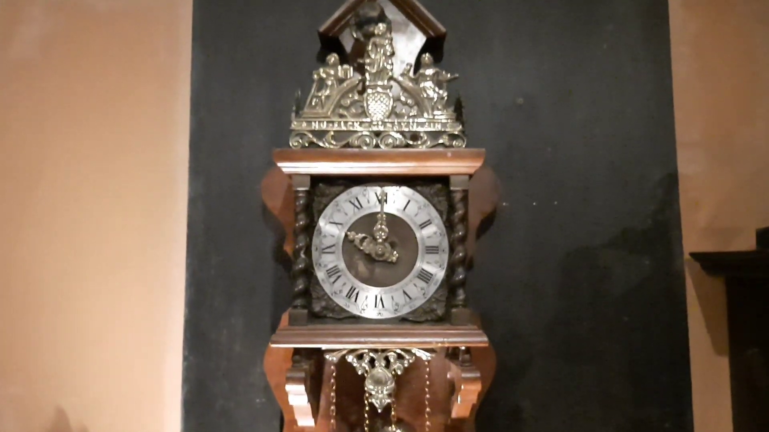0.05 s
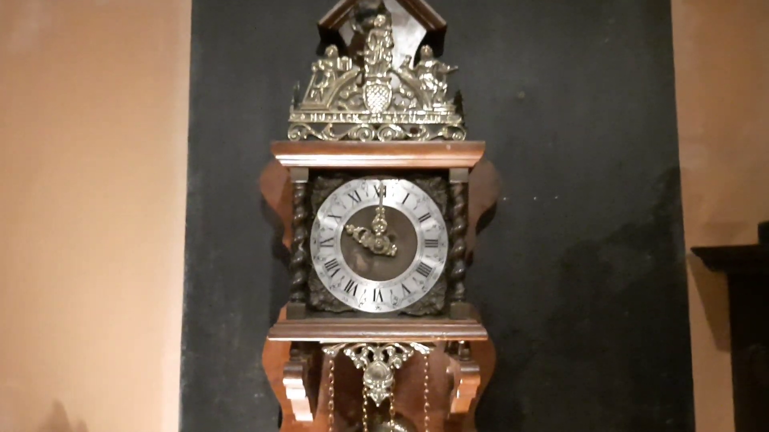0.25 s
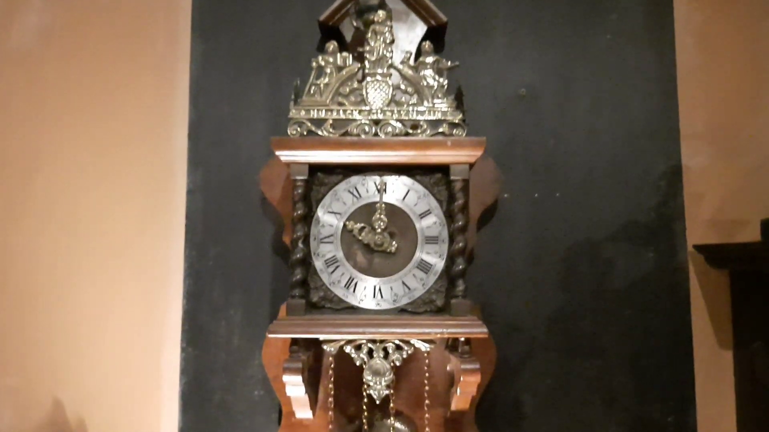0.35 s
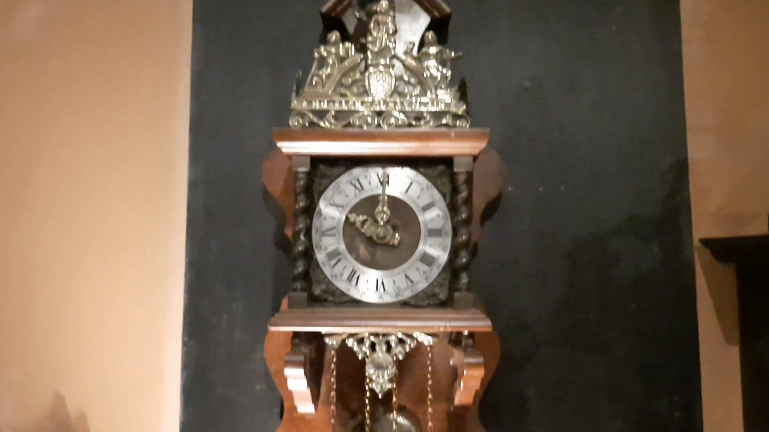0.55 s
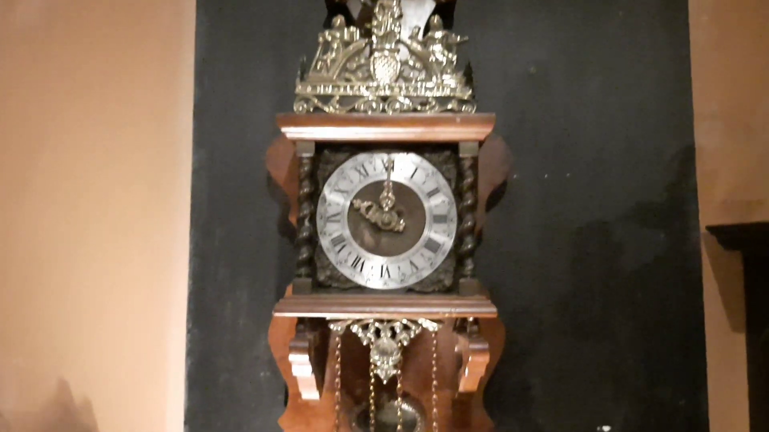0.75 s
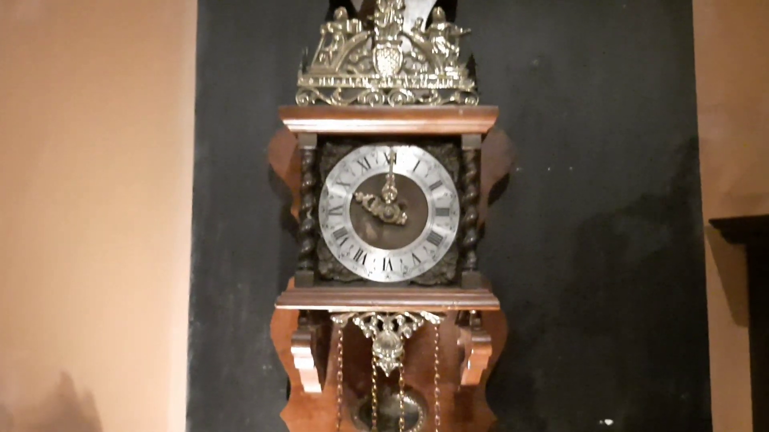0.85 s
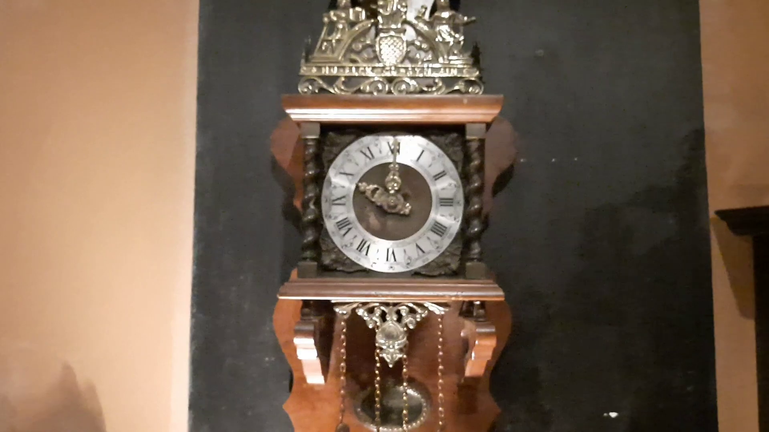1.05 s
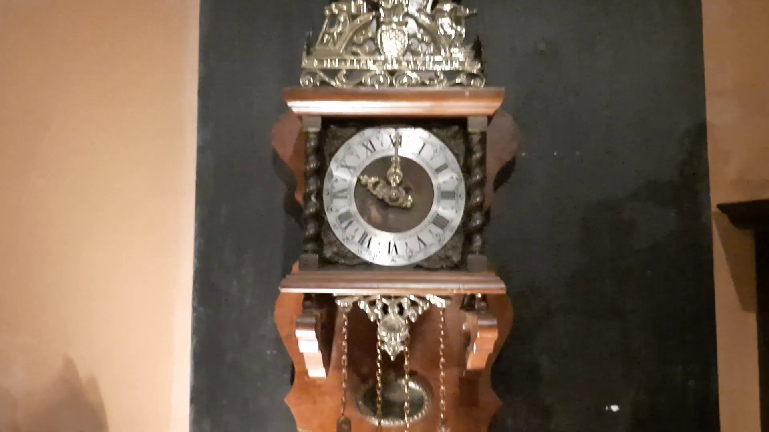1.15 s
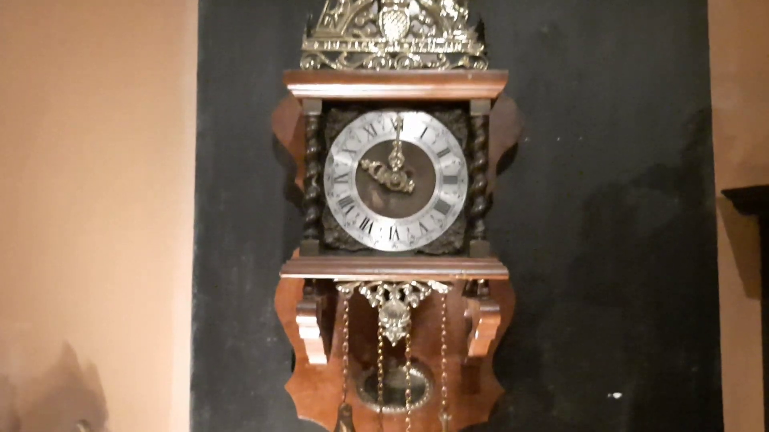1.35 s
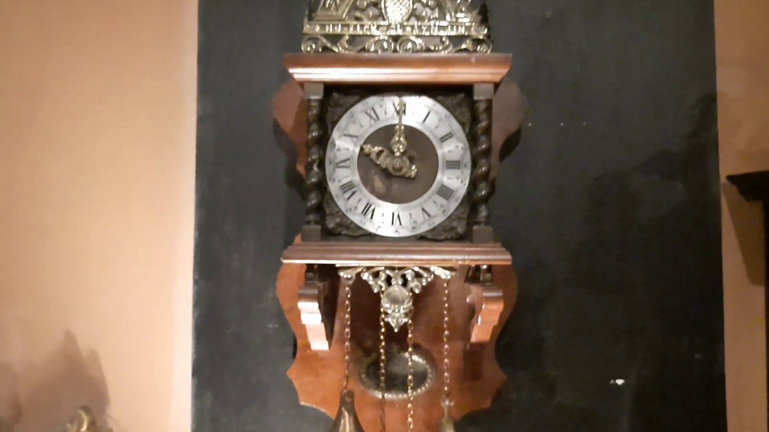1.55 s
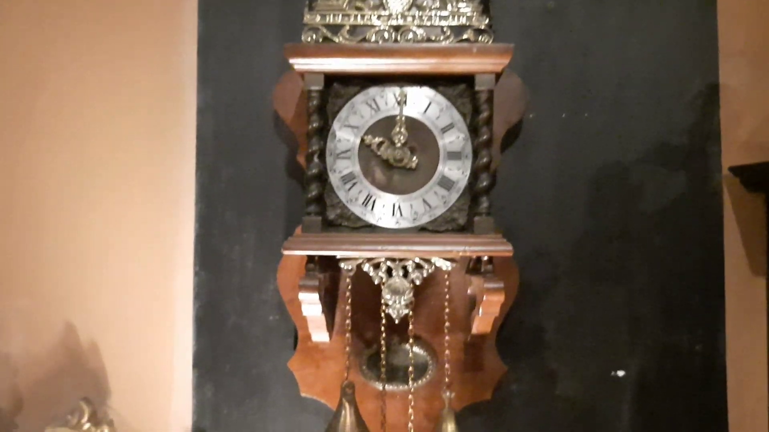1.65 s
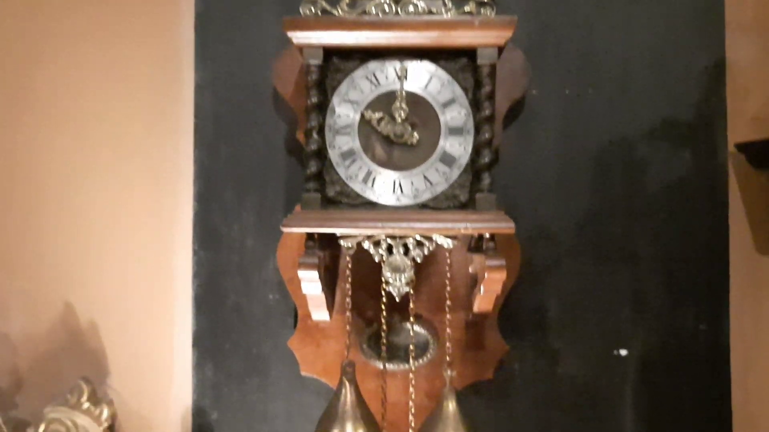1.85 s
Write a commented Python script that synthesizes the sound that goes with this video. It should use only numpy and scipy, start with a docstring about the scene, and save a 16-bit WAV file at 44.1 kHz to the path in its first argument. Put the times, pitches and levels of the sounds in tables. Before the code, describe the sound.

A wall clock bell strikes once and rings on over faint ticking.

```python
"""A quiet room drones and hums with the mains while a wall clock's bell still rings from its last stroke.
The striking wheels rustle and the hammer lifts with two dull knocks. At 0.22 s it hits the small bell
once: a crack, a short ring of the case and a shimmer in the room. The bell's high tones die fast;
the low ones ring on and beat differently at each ear, while the clock ticks softly."""
import sys
import numpy as np
from scipy import signal
from scipy.fft import rfft, irfft
from scipy.io import wavfile

SR = 44100
rng = np.random.default_rng(int(sys.argv[2]) if len(sys.argv) > 2 else 0)


def transcribe(signal):
    """Save signal, clipped to [-1, 1], as a 16-bit WAV file at the path in sys.argv[1]."""
    frames = np.atleast_2d(signal).T
    limited = np.clip(frames, -1, 1)
    pcm = np.round(limited * 32767).astype(np.int16)
    wavfile.write(sys.argv[1], SR, pcm)


N = 83790
STRIKE_S = .2198  # when the hammer lands


def undb(db):
    """Turn decibels into a gain."""
    return 10 ** (np.asarray(db) / 20)


def since(start):
    """Seconds since a moment, zero before it."""
    return np.maximum(np.arange(N) / SR - start, 0)


def ring(start, swell, t60):
    """Swell, then die away. The ring time t60 is the seconds it takes to fall by 60 dB."""
    age = since(start)
    return (1 - np.exp(-age / max(swell, 1e-5))) * np.exp(-np.log(1000) * age / t60)


def ears(left, right):
    """One value for each ear."""
    return np.array([[left], [right]])


def turn(hz, start):
    """One pure vibration as a spinning arrow; its .imag is a sine wave."""
    return np.exp(2j * np.pi * hz * since(start))


# Each row: frequency in Hz, how alike the ears are (1 is fully alike).
EAR_LIKENESS = [(60, 0.49), (250, 0.77), (600, 0.42), (2000, 0), (8000, 0)]
def noise(colour):
    """Stereo noise, partly alike at both ears in the bass. Colour rows: Hz, relative level in dB."""
    log_hz = np.log(np.maximum(np.arange(N // 2 + 1) * SR / N, 1))
    read = lambda rows: np.interp(log_hz, np.log(np.array(rows)[:, 0]), np.array(rows)[:, 1])
    alike = read(EAR_LIKENESS)
    mid, side = rfft(rng.standard_normal((2, N)))
    spectrum = mid * np.sqrt(1 + alike) + ears(1, -.81) * side * np.sqrt(1 - alike)
    hiss = irfft(spectrum * undb(read(colour)), N)
    return hiss / np.sqrt(np.mean(hiss ** 2))


# Each row of both colours: frequency in Hz, relative level in dB.
AIR_COLOUR = [(25, -23), (45, -6), (63, 4), (85, -1), (130, -5.5), (200, -11), (310, -3.5), (420, -6.5),
              (750, -13), (1500, -14.5), (2100, -18), (2700, -15), (3400, -15), (4300, -40.5), (6000, -37),
              (7800, -31.5), (10000, -39.5), (15500, -45.5)]
DRONE_COLOUR = [(100, -70), (200, -30), (270, -10), (305, 2), (335, -3.5), (380, -16), (520, -36.5),
                (1000, -90)]
# Each row: time in seconds, change of the air's level in dB.
AIR_SWELL = [(0, 2.5), (.3, 2), (.7, -1.5), (1.1, -0.8), (1.45, -3), (1.8, 0.3)]
# Each row: time in seconds, the drone's level in dB.
DRONE_LEVELS = [(0, -59.5), (.4, -57.5), (.75, -66), (1.05, -57), (1.5, -61), (1.7, -52.5), (1.9, -53)]
def room():
    """A faint hollow drone, soft airy noise and a steady mains hum."""
    air_db, hum_db, hum_hz = -49, -41.5, 99.5
    follow = lambda rows: np.interp(since(0), *np.array(rows).T)
    drone = undb(follow(DRONE_LEVELS)) * noise(DRONE_COLOUR)
    air = undb(air_db + follow(AIR_SWELL)) * noise(AIR_COLOUR)
    hum = undb(hum_db) * turn(hum_hz, 0).imag
    return drone + air + hum


# The pitches of the bell's seven tones in Hz, lowest first.
BELL_HZ = [1307.6, 3358, 5885.2, 8768, 11997, 14348, 15573]
# The lowest four tones. Each row: ring time in seconds, left level in dB, rough right level in dB.
LINGERING_TONES = [(5.2, -38.5, -41.5), (1.27, -22, -21), (1.2, -53.5, -61), (2.4, -62, -60.5)]
def lingering_bell():
    """The low tones of the stroke before ring on until the landing hammer stops them."""
    damp_s = .015
    out = 0
    for hz, (t60, left_db, right_db) in zip(BELL_HZ, LINGERING_TONES):
        tone = (ears(1j, .94) * turn(hz, 0)).imag  # 1j puts the left a quarter cycle ahead
        out += undb(ears(left_db, right_db)) * tone * ring(0, 0, t60)
    return out * np.exp(-since(STRIKE_S) / damp_s)


# Each row: start in seconds, level in dB, ring time in seconds.
WHEEL_RUSTLES = [(.083, -57.5, .1), (0.115, -52, 0.11), (0.145, -53, 0.98), (0.639, -55.5, 0.66),
                 (0.818, -68, 0.62), (1.023, -50.5, .4), (1.083, -58, 0.51), (1.27, -61, 0.35),
                 (1.36, -74, .2), (1.518, -54, .35), (1.795, -72, .4)]
# Each row: frequency in Hz, relative level in dB.
WHEEL_COLOUR = [(800, -4.5), (2500, -1), (4500, -5.5), (6200, -12.5), (7800, -1.5), (10000, -15),
                (12600, -8), (15500, -26.5)]
def striking_wheels():
    """The levers and wheels that drive the hammer rustle as they move."""
    bursts = sum(undb(db) * ring(start, swell=.009, t60=t60) for start, db, t60 in WHEEL_RUSTLES)
    return noise(WHEEL_COLOUR) * bursts


# Each row: start in seconds, level in dB.
LEVER_KNOCKS = [(0.085, -42.5), (0.128, -47.5)]
# Each row: frequency in Hz, relative level in dB.
LEVER_COLOUR = [(200, -4.5), (1000, 2), (2500, 2.5), (3800, -38), (8000, -27.5)]
def hammer_lever():
    """The lever knocks dully as it lifts the hammer."""
    return noise(LEVER_COLOUR) * sum(undb(db) * ring(start, 0, t60=.15) for start, db in LEVER_KNOCKS)


# Each row: frequency in Hz, relative level in dB.
BLOW_COLOUR = [(60, -6.5), (250, -9), (500, -8), (800, -16), (1400, -1.5), (2000, -6), (3000, -4),
               (4500, -10.5), (7000, -3.5), (7900, -14), (9000, 1), (10500, -5), (12000, 1), (13300, -9.5),
               (14400, 4), (16000, -8.5)]
def hammer_blow():
    """The hammer hits with a sharp crack, which washes around the room."""
    crack = undb(-14.5) * noise(BLOW_COLOUR) * ring(STRIKE_S, swell=0, t60=.028)
    wash = undb(-22.5) * noise(BLOW_COLOUR) * ring(STRIKE_S, swell=.004, t60=.26)
    return crack + wash


# The pitches of the case and hammer arm in Hz.
CASE_PITCHES = [258, 287, 420, 1018, 1345, 2616, 2805, 4538, 5189, 9652, 11757]
# Each row, one per pitch: ring time in seconds, relative level in dB.
CASE_RINGS = [(.5, -39), (.45, -37), (.45, -42.5), (0.23, -35), (.14, -27), (.17, -34), (.3, -39),
              (.19, -41), (0.37, -46), (0.17, -34), (0.18, -34)]
def clock_case():
    """The blow sets the case and hammer arm ringing briefly."""
    out = 0
    for hz, (t60, db) in zip(CASE_PITCHES, CASE_RINGS):
        phase = rng.uniform(0, 1.6, (2, 1))
        tone = (turn(hz, STRIKE_S) * np.exp(1j * phase)).imag
        out += undb(db) * tone * ring(STRIKE_S, swell=.002, t60=t60)
    return out


def bell_tone(hz, t60, swell, flare_s, db, flare_db, twin_hz, share, dip_s, fade):
    """One tone at one ear: it flares or blooms, and beats against a slightly out-of-tune twin."""
    age = since(STRIKE_S)
    twin = share * np.exp(-fade * age + 2j * np.pi * twin_hz * (age - dip_s))
    early_db = flare_db * np.exp(-(age / flare_s) ** 2)
    return undb(db + early_db) * ring(STRIKE_S, swell, t60) * (1 - twin) * turn(hz, STRIKE_S)


# Each row, one per tone: ring, swell and flare times in seconds, the left ear's lead in cycles.
BELL_SHAPES = [(10.5, 0.035, 0.1, -0.23), (10.7, 0.0299, 0.3, -0.34), (5.53, 0.008, 0.15, 0.38),
               (2.614, 0.00206, 0.13, -0.482), (0.87, 0.0023, 0.102, -0.26), (0.3, 0.0018, 0.037, 0.281),
               (0.473, 0.0256, 0.0362, 0.27)]
# Each row, one per tone: relative level in dB, early boost or cut in dB, the twin's offset in Hz,
# its relative strength, time of a dip in the beating in seconds, the twin's extra fade per second.
BELL_LEFT = [(-36.5, -0.5, 9.5, 0.81, 0.04, 5.0), (-27, -0.3, -2, 2.39, 0.0601, 1.87),
             (-27.5, 6.5, 5, 0.695, 0.003, 1.23), (-17.0, 7.5, 0.9548, 1.61, 1.11, 1.42),
             (-17, 18, -6, 0.55, 0.014, 3.7), (-32, 20.0, 13.5, 1, 0.0219, 6.67),
             (-6, -8, -7, 1.15, 0.0837, 3.55)]
BELL_RIGHT = [(-37, 1.5, 9.5, 0.316, 0.0436, 1.1), (-27, 2.5, -2.5, 0.43, 0.33, -0.38),
              (-23, -8.5, 0.337, 0.31, 1.255, -0.43), (-21.5, 16.5, -1.0, 0.92, 0.048, 2.6),
              (-11, -12.5, 2.5, 1.5, 0.21, 3), (-32, 3.5, 29.5, 0.551, 0.023, 6),
              (-3, 10.5, -0.0659, 0.732, 0.69, 3.5)]
def bell():
    """The struck bell rings with all its tones, each reaching the two ears out of step."""
    out = 0
    for hz, (t60, swell, flare_s, lead), left, right in zip(BELL_HZ, BELL_SHAPES, BELL_LEFT, BELL_RIGHT):
        pair = np.array([bell_tone(hz, t60, swell, flare_s, *ear) for ear in (left, right)])
        out += (pair * ears(np.exp(2j * np.pi * lead), 1)).imag
    return out


# The shimmer's relative level in dB around each bell tone.
SHIMMER_LEVELS = [-38.5, -32, -35.5, -27, -22, -28, -26]
def shimmer():
    """The bell's sudden tones make the room ring for a moment at nearby pitches."""
    width_hz = 70
    hz = np.arange(N // 2 + 1) * SR / N
    out = 0
    for centre, db in zip(BELL_HZ, SHIMMER_LEVELS):
        distance = (hz - centre) / width_hz
        band = irfft(rfft(rng.standard_normal((2, N))) / (1 + distance ** 2), N)
        out += undb(db) * band / np.std(band)
    return out * ring(STRIKE_S, swell=.0058, t60=.3)


# Each row: start in seconds, relative level in dB.
TICK_TIMES = [(0.3827, -44.5), (.8281, -37.5), (1.263, -53), (1.3619, -49.5), (1.6298, -48),
              (1.8039, -38.5), (1.8393, -52.5)]
# Each row: frequency in Hz, relative level in dB.
CLICK_COLOUR = [(800, -15), (2250, 12), (4000, -20.5), (8000, -13), (15000, -29.5)]
# Each row: pitch in Hz, ring time in seconds, relative level in dB.
PING_TONES = [(2265, 0.11, 0), (2226, .1, -7), (2375, .06, -9)]
def escapement():
    """The catch that lets the wheels step forward ticks: a click with a small ping."""
    click_db, ping_db = -14, -5
    bursts = pings = 0
    for start, db in TICK_TIMES:
        bursts += undb(db + click_db) * ring(start, 0, t60=.048)
        for hz, t60, tone_db in PING_TONES:
            tone = (ears(1j, 1) * turn(hz, start)).imag
            pings += undb(db + ping_db + tone_db) * tone * ring(start, 0, t60)
    return noise(CLICK_COLOUR) * bursts + pings


def scene():
    """The clock in its room, with the clang of the blow a little to the left."""
    clang = (hammer_blow() + clock_case() + shimmer()) * undb(ears(1.5, -1.5))
    clockwork = escapement() + striking_wheels() + hammer_lever()
    return room() + lingering_bell() + clockwork + clang + undb(.3) * bell()


def record(dry):
    """Clip the highest peaks and cut the very top of the treble."""
    top_hz = 16100
    lowpass = signal.ellip(10, .1, 70, top_hz, fs=SR, output="sos")
    return signal.sosfilt(lowpass, np.clip(dry, -1, 1))


dry = scene()
out = record(dry)
transcribe(out)
```